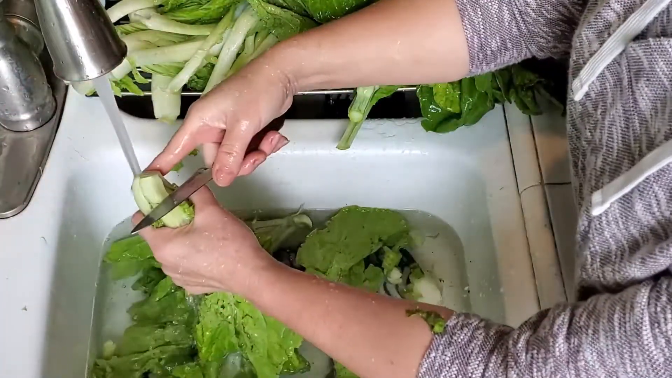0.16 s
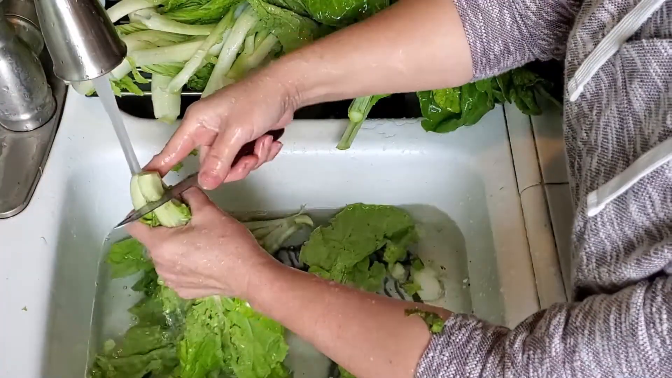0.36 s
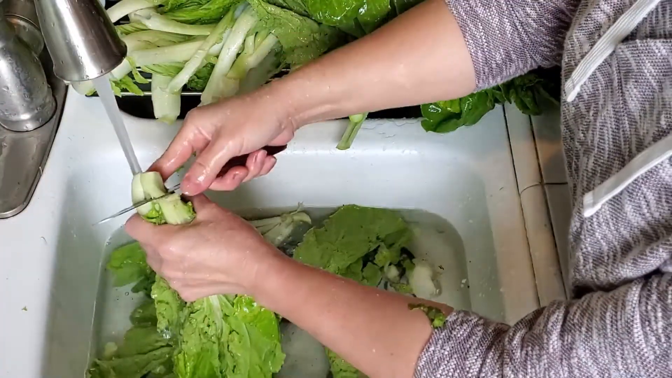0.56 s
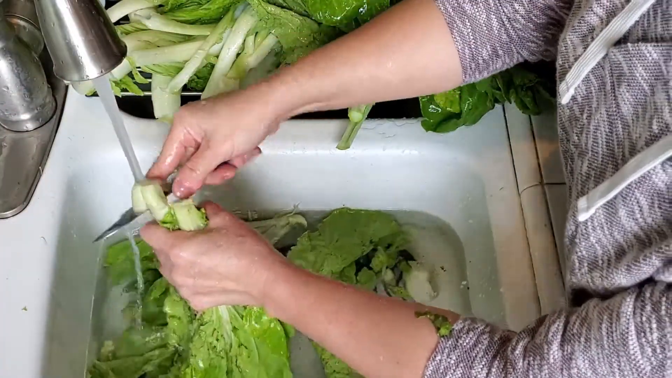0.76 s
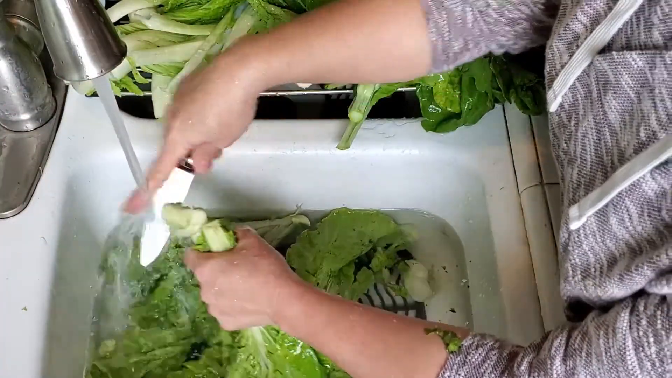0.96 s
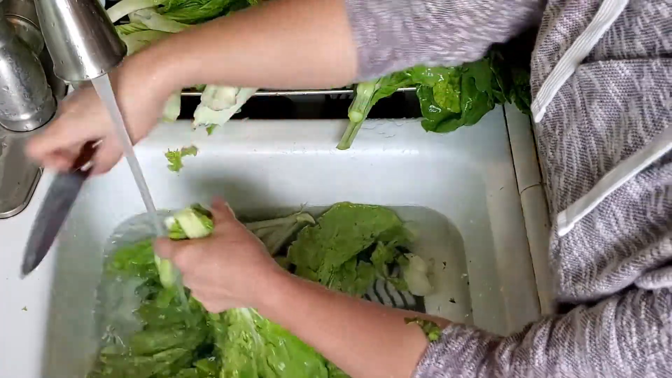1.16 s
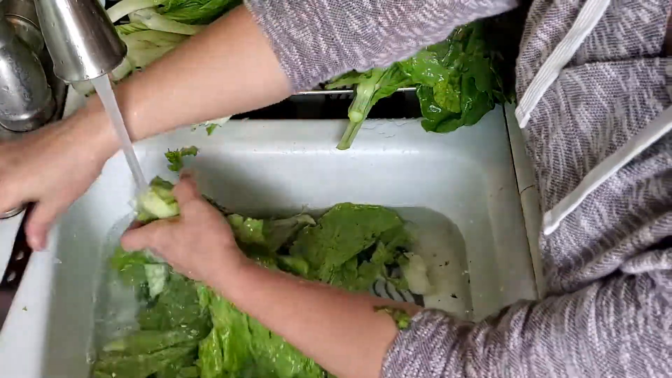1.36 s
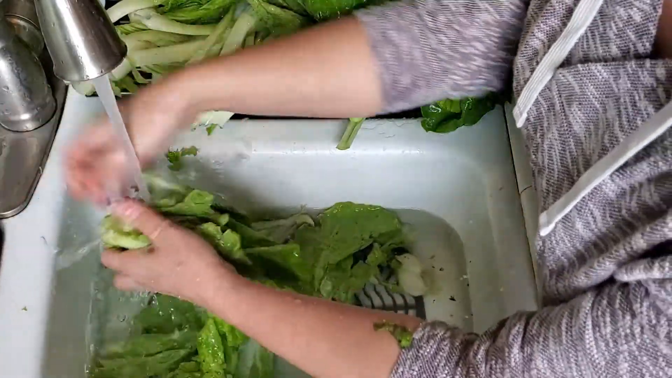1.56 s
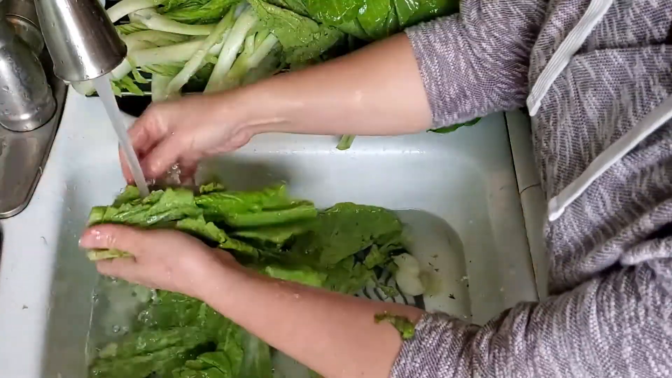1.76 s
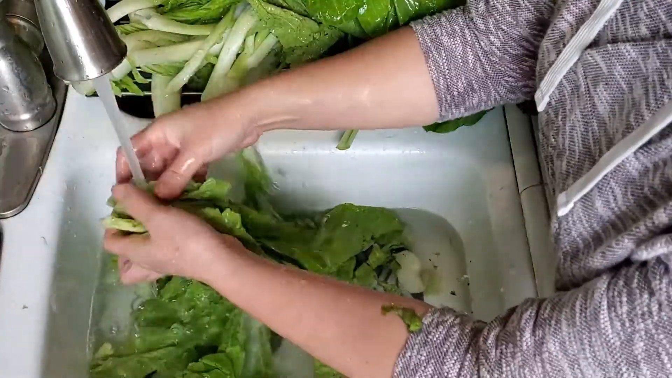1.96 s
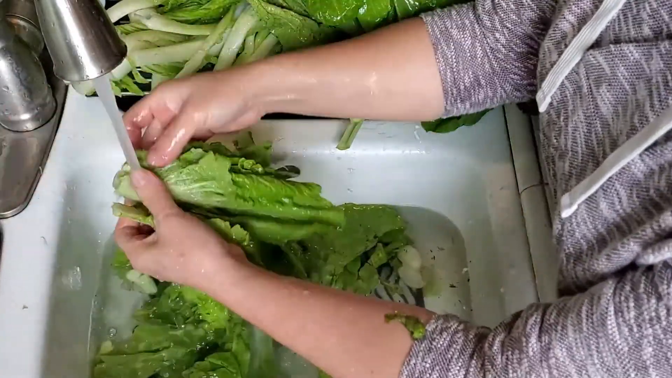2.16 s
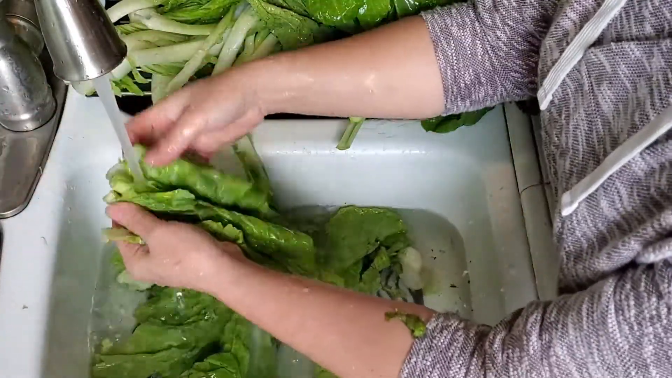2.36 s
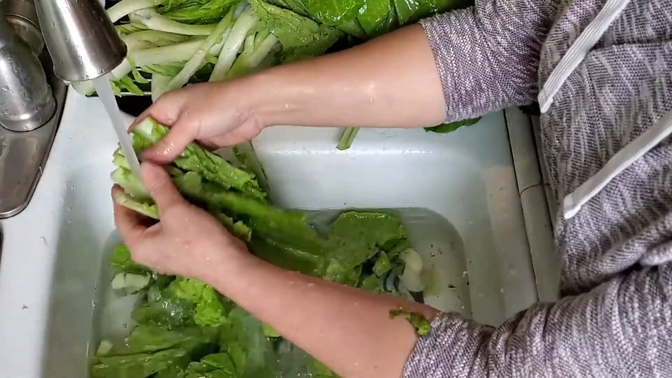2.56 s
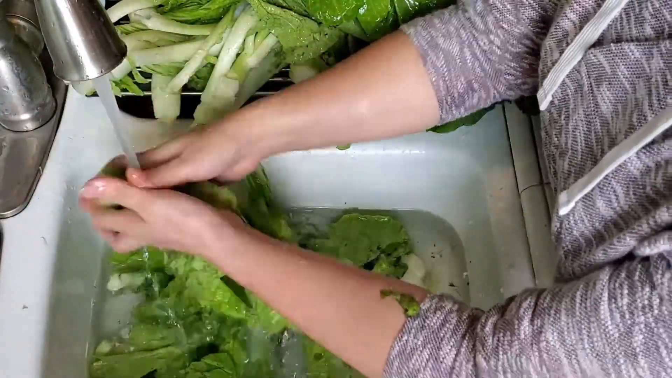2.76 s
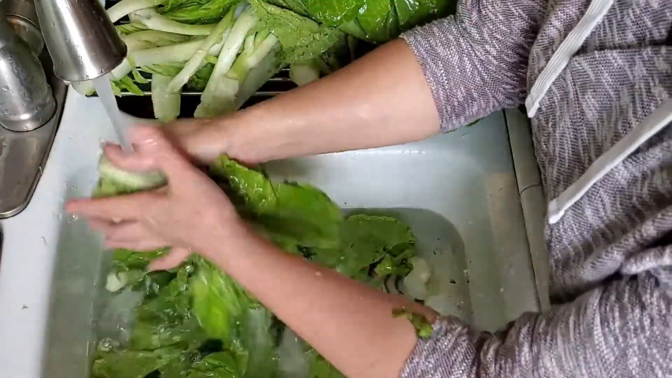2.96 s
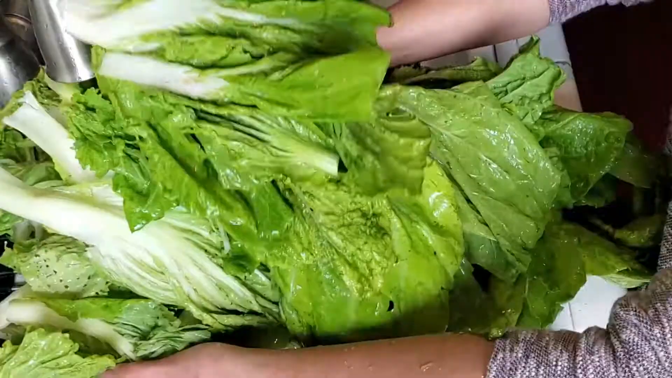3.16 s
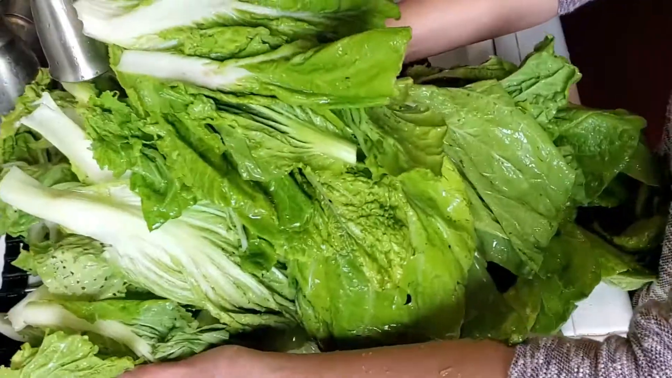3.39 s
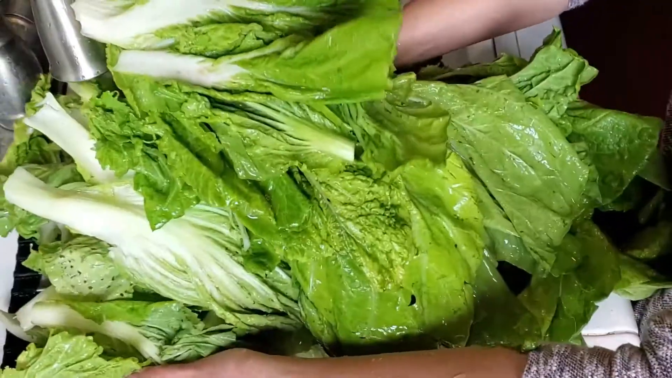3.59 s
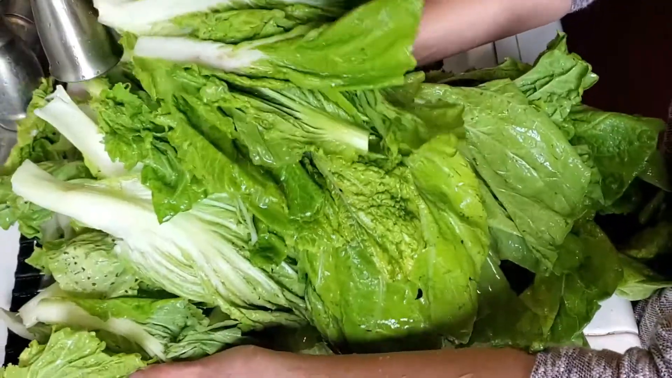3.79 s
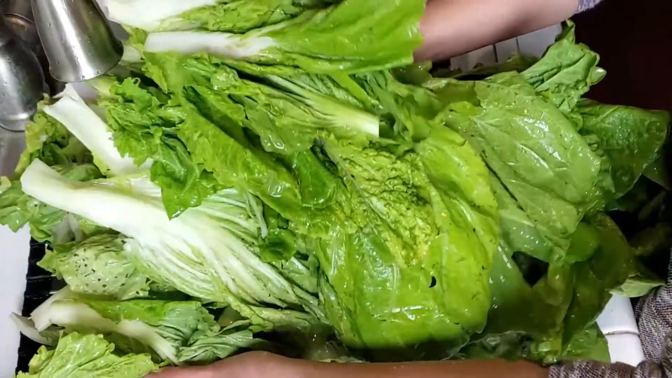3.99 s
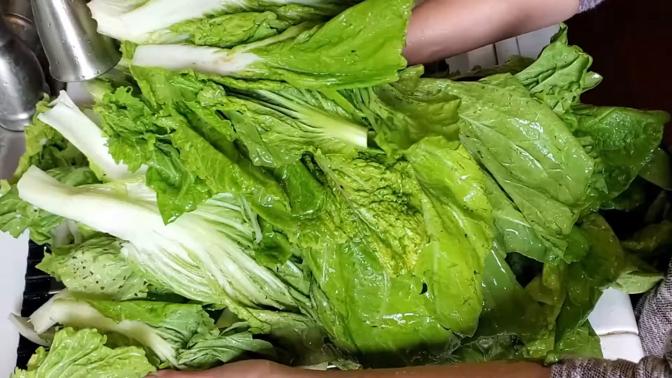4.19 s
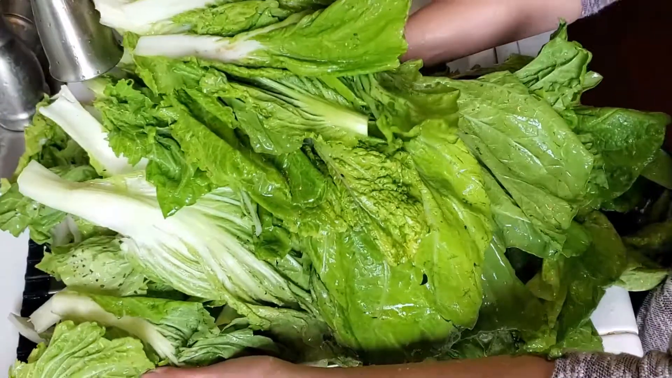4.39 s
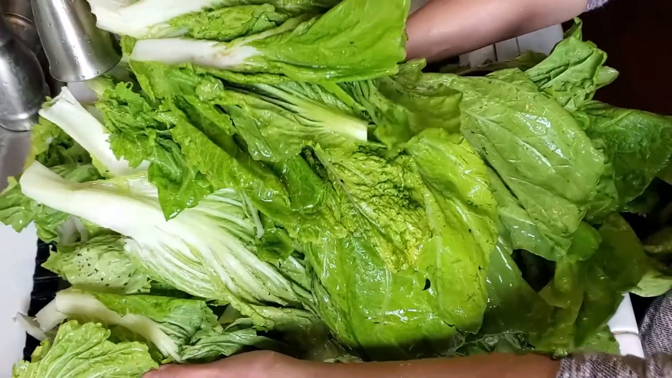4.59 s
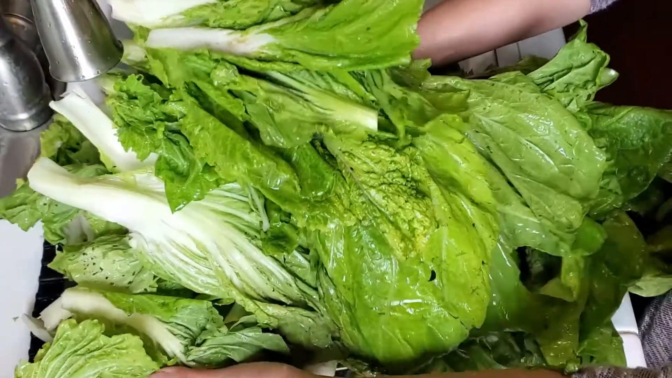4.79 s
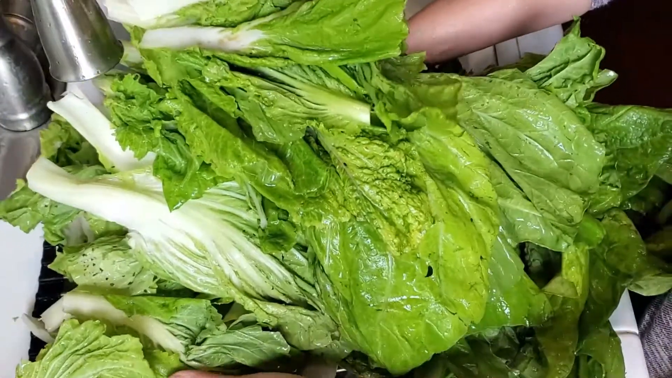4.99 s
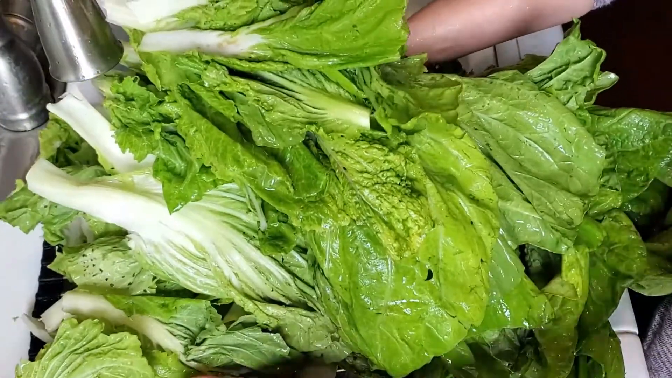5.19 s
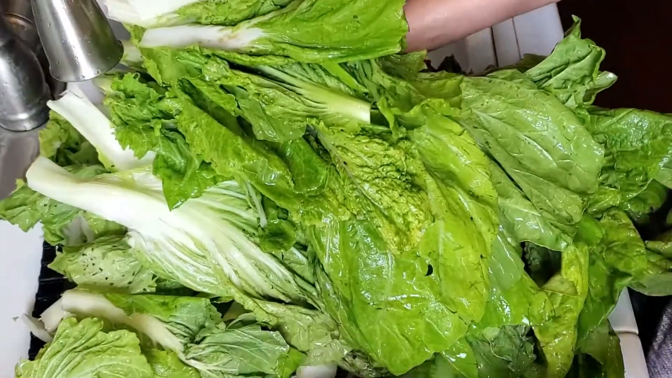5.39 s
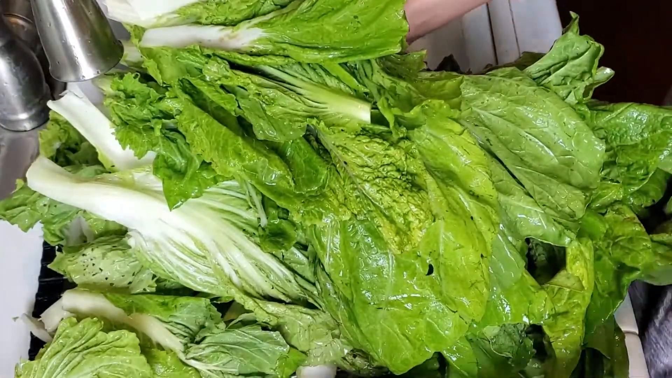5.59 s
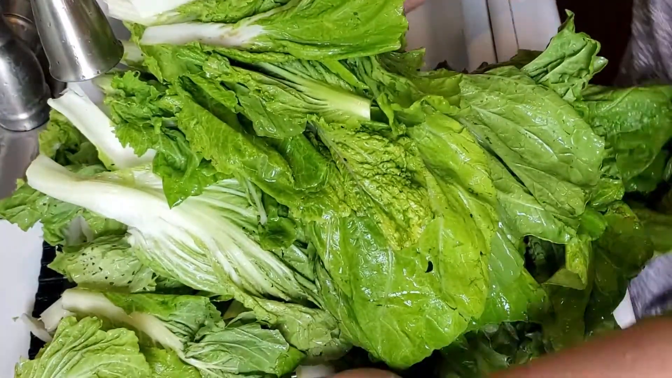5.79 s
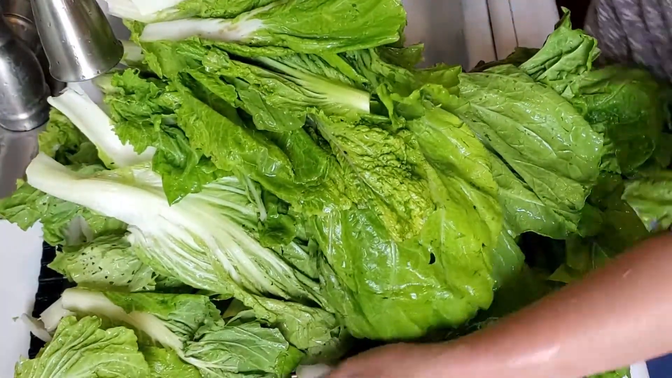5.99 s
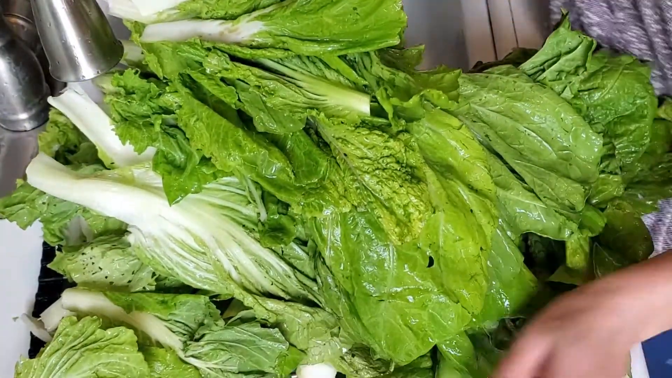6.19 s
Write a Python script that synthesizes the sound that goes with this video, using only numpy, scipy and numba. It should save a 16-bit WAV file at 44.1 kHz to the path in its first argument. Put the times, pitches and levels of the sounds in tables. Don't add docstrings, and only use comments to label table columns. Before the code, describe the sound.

Kitchen tap hisses over leafy greens as a knife cracks stalks and clatters down, then water abruptly stops, leaving drain drips and wet leaf ticks.

```python
import sys
import numpy as np
from scipy import signal
from scipy.fft import rfft, irfft
from scipy.io import wavfile
from scipy.ndimage import uniform_filter1d
from numba import njit

SR = 44100
rng = np.random.default_rng(int(sys.argv[2]) if len(sys.argv) > 2 else 0)


def inscribe(sig):
    pcm = np.round(np.clip(np.atleast_2d(sig).T, -1, 1) * 32767)
    wavfile.write(sys.argv[1], SR, pcm.astype(np.int16))


def boost_factor(decibels):
    exponent = np.asarray(decibels, float) / 20
    return 10 ** exponent


N = 275625
TAP_OFF_S = 3.218
PORT_TILT_DB = np.array([[0.8], [-0.8]])


def unit(x):
    return x / np.sqrt(np.mean(x ** 2))


def curves(table):
    s, *columns = np.transpose(table)
    return [np.interp(np.arange(N) / SR, s, c) for c in columns]


def on_log(hz, points):
    point_hz, value = np.array(points)[:, :2].T
    return np.interp(np.log(hz), np.log(point_hz), value)


@njit
def svf(x, hz, width):
    y, b, l = np.empty(len(x)), 0., 0.
    g, k = np.tan(np.pi * hz / SR), width / hz
    for i in range(len(x)):
        v = (b + g * (x[i] - l)) / (1 + g * (g + k))
        b, l, y[i] = 2 * v - b, l + 2 * g * v, k * v
    return y


def svf_twice(x, hz, width):
    return svf(svf(x, hz, width), hz, width)


def walk(rate_hz):
    k = max(int(SR / rate_hz), 1)
    held = np.repeat(rng.standard_normal(N // k + 1), k)
    return 1.7 * uniform_filter1d(uniform_filter1d(held, k), k)[:N]


def droplets(rate_hz, spread_db):
    size = np.minimum(rng.exponential(size=N), 3.5)
    return (rng.random(N) < rate_hz / SR) * rng.choice([-1., 1.], N) * boost_factor(spread_db * size)


def hiss(droplet_db, rate_hz, spread_db):
    return rng.standard_normal(N) + boost_factor(droplet_db) * unit(droplets(rate_hz, spread_db))


def tinted(x, points):
    hz = np.maximum(np.fft.rfftfreq(N, 1 / SR), 1)
    return unit(irfft(rfft(x) * boost_factor(on_log(hz, points)), N))


def add(out, s, x):
    i = int(s * SR)
    out[i:i + len(x)] += x[:N - i]


def until_tap_off(fade_s):
    return np.clip((TAP_OFF_S - np.arange(N) / SR) / fade_s, 0, 1)


def patchy(x, patchy_db, span_s, span_hz):
    frames = signal.stft(x, nperseg=256)[2]
    wide, long = max(int(span_hz * 256 / SR), 1), max(int(span_s * SR / 128), 1)
    field = uniform_filter1d(rng.standard_normal(frames.shape[-2:]), wide, axis=0)
    field = uniform_filter1d(uniform_filter1d(field, long, axis=1), long, axis=1)
    return signal.istft(frames * boost_factor(patchy_db * unit(field)), nperseg=256)[1][..., :N]


def bubbles(table, t60_s, glide, beat, rough, rise_s):
    out, t = np.zeros(N), np.arange(SR // 3) / SR
    chance = rng.standard_normal((len(table), 2))
    churn = 1 + rough * walk(220)
    onset = (1 - np.exp(-t / max(rise_s, .0005))) ** 2
    for (s, db, hz), (detune, turn) in zip(table, chance):
        t60 = t60_s * (1000 / hz) ** 0.19
        phase = 2 * np.pi * hz * t * (1 + glide * t * hz / 1000)
        ring = np.sin(phase) + beat * np.sin(phase * (1 + 0.046 * detune) + turn)
        add(out, max(s - rise_s, 0), boost_factor(db + 1.5) * ring * onset * 1000 ** (-t / max(t60, .01)))
    return out * churn


def snaps(table, length_s, sharpness, broad_db):
    out, t = np.zeros(N), np.arange(SR // 6) / SR
    for s, db, hz, *_ in table:
        rise = np.minimum(t / 0.00062 * boost_factor(db + 16), 1)
        burst = rng.standard_normal(len(t)) * np.exp(-t / max(length_s, .001)) * rise
        broad = boost_factor(broad_db) * svf(burst, 11900.0, 33000.0)
        bright = broad + np.sqrt(sharpness) * svf(burst, 1. * hz, hz / sharpness)
        add(out, s, boost_factor(db) * bright / np.abs(bright).max())
    return out


# t/s, spray off hands and leaves level/dB, plunge into the pool level/dB
FLOW_DB = [(0.0, -43, -53), (0.37, -39.5, -48), (0.5, -47, -49.5), (0.8, -43, -48.5), (1.12, -39.5, -52),
           (1.39, -40, -50), (1.47, -61, -46), (1.6, -51, -45.5), (1.76, -48, -56), (1.95, -49, -55),
           (2.06, -45, -52), (2.2, -44, -52.5), (2.4, -49, -57.5), (2.55, -46, -57.5), (2.78, -49.5, -53.5),
           (2.9, -47, -47.5), (3.06, -43.5, -49), (3.21, -45, -50)]
# f/Hz, density level/dB
SPRAY_DB = [(1470, -45), (2500, -7.5), (5420, 4), (6760, 1), (7920, -6), (9200, -1), (15100, 2),
            (16100, -3), (16500, -52)]
# f/Hz, density level/dB
SPLASH_DB = [(260, -17), (450, -29), (698, 2.5), (793, -4), (1250, -1), (1480, -1.5), (2000, 1.5),
             (4000, 1), (5200, -6), (8800, -120)]


def tap(surge):
    spray_db, splash_db = curves(FLOW_DB)
    fine = hiss(11.5, 2500, 4.1)
    coarse = hiss(0.0, 500, 2.7)
    spray = tinted(fine, SPRAY_DB) * boost_factor(spray_db + 2.0 + 0.8 * surge + 1.6 * walk(55))
    splash = tinted(coarse, SPLASH_DB) * boost_factor(splash_db + 3.0 + 1.06 * surge + 2.57 * walk(24.88))
    return (spray + splash) * until_tap_off(.004)


def spatter(count=260):
    when, pitch, size = rng.random((count, 3)).T
    s = when * TAP_OFF_S
    pool_db = np.interp(s, *np.transpose(FLOW_DB)[[0, 2]])
    db = pool_db + 1.5 - 2.8 * np.log(np.maximum(size, .05))
    hz = 1400 * 2 ** (2.4 * pitch)
    return bubbles(np.transpose([s, db, hz]), t60_s=0.05, glide=0.74, beat=0.42, rough=0.55, rise_s=.002)


# t/s, peak level/dB, f/Hz
PLOPS = [(0.018, -28, 797), (0.045, -39, 700), (0.258, -33.5, 1606), (0.322, -41, 794), (0.379, -43, 990),
         (0.489, -31.5, 930), (0.509, -36, 1330), (0.547, -30, 947), (0.632, -32, 940), (0.648, -30.5, 940),
         (0.833, -36.5, 933), (0.347, -36, 524), (0.35, -31.5, 1540), (0.47, -36, 623), (0.655, -27, 1620),
         (0.909, -35.5, 1160), (1.081, -34, 1150), (1.157, -27, 940), (1.168, -27, 1043), (1.262, -30, 595),
         (1.288, -29.5, 625), (1.49, -38.5, 602), (1.562, -35, 720), (1.774, -41.5, 1117),
         (2.335, -46, 1120), (2.71, -45, 1155), (2.038, -36, 1212), (2.239, -39, 1330), (2.871, -28, 646),
         (2.919, -48, 676)]


def plops():
    return bubbles(PLOPS, t60_s=0.093, glide=1.0, beat=0.5, rough=0.45, rise_s=.0025)


# t/s, length/s, level/dB, centre f/Hz
SLOSH = [(0.825, 0.042, -39, 1280), (0.859, .016, -29, 2150), (0.86, .012, -35, 3800),
         (0.872, .03, -37, 2400), (0.895, .05, -45, 1600), (0.927, 0.017, -44, 3300),
         (1.007, 0.014, -33.5, 3570), (1.025, 0.018, -36, 3800), (1.172, 0.024, -33, 3200),
         (1.177, .015, -36, 1620), (1.225, .015, -37, 2900), (1.231, 0.021, -38, 3600),
         (1.256, 0.0072, -36, 3800), (1.328, 0.031, -39, 3300), (1.873, .015, -46.5, 2990),
         (1.967, .015, -48, 3360), (2.162, 0.018, -54, 4500), (2.192, 0.13, -45, 1400),
         (2.24, 0.045, -46, 4660), (2.32, 0.028, -45, 2960), (2.435, 0.018, -54, 4300),
         (2.532, 0.056, -47, 1910), (2.573, 0.045, -46, 3500), (2.645, .035, -47, 3370),
         (2.675, 0.025, -46, 1630), (2.77, .025, -49.5, 4130), (2.902, 0.062, -46.5, 1190)]


def slosh():
    out, t = np.zeros(N), np.arange(SR // 4) / SR
    swarm = hiss(3.0, 900, 2.7)
    for s, length_s, db, hz in SLOSH:
        x = t / max(0.22 * length_s, .0005)
        band = svf(swarm[int(s * SR):][:len(t)], 1. * hz, hz / 4)
        band = svf(band, 1. * hz, hz / 2)
        add(out, s, boost_factor(db) * unit(band) * x * np.exp(1 - x))
    return out


# t/s, peak level/dB, centre f/Hz
SPURTS = [(1.7292, -36, 12200), (1.8415, -34, 13500), (1.9028, -35, 10600), (1.9577, -36, 13300),
          (2.0166, -35, 12500), (2.061, -31, 11100), (2.1288, -35, 12400), (2.1862, -37, 12800),
          (2.2431, -32, 12400), (2.2874, -36, 15300), (2.3583, -39, 12400), (2.4107, -38, 13600),
          (2.4655, -35, 12300), (2.5379, -33, 13000), (2.6362, -38, 13900), (2.692, -33, 13800),
          (2.7235, -35, 15100), (2.7584, -36, 13600), (2.919, -34, 12800), (2.9599, -33, 10500),
          (2.9928, -29, 14300), (3.0328, -33, 12400), (3.0886, -35, 10400), (3.144, -32, 12000)]


def spurts():
    return snaps(SPURTS, length_s=.008, sharpness=2.5, broad_db=3.0)


# t/s, peak level/dB, centre f/Hz, body relative level/dB, body f/Hz
CRACKS = [(0.263, -24, 4900, -20, 1590), (0.31, -25.5, 5960, -10, 880), (0.3483, -19.5, 6200, -7, 880),
          (0.4661, -23.5, 6700, -2, 940), (0.4697, -11, 5800, -5.5, 1300), (0.535, -18.5, 3800, -11, 1040),
          (0.63, -18.5, 3680, -12, 1030), (0.6504, -20, 6050, -10, 1040), (0.8576, -23, 3870, -0.5, 2320),
          (1.063, -20, 5700, -40, 1160), (1.157, -25, 4900, -10.5, 940), (2.0595, -29, 4830, -13, 1230),
          (2.8554, -31, 3520, -25, 735), (2.8722, -22.5, 6000, -24, 651), (2.9347, -31.5, 3740, -6.5, 1730),
          (3.14, -32, 6810, -4, 1720), (3.176, -25, 5470, -4.5, 1670)]


def cracks():
    return snaps(CRACKS, length_s=0.0084, sharpness=3.2, broad_db=-3.0)


# f/Hz, width/Hz, level/dB
SINK_MODES = [(313, 90, -6), (564, 180, 10), (940, 73, 5.5), (1300, 120, 2), (1610, 220, -2),
              (1920, 160, -4), (2350, 260, -13)]


def knocks():
    out, t = np.zeros(N), np.arange(SR // 6) / SR
    for s, db, _, body_db, body_hz in CRACKS:
        push = rng.standard_normal(len(t)) * np.exp(-t / (0.64 * 0.0084))
        body = boost_factor(-15.0) * svf(push, 1. * body_hz, 0.69 * body_hz)
        for hz, width_hz, mode_db in SINK_MODES:
            octaves_off = abs(np.log2(hz / body_hz))
            body = body + boost_factor(mode_db - 22.0 * octaves_off) * svf(push, 1. * hz, 1. * width_hz)
        add(out, s, boost_factor(db + body_db + 6.5) * body / np.abs(body).max())
    return out


# t/s, peak level/dB, chatter decay/s, mode 1 f/Hz, mode 2 f/Hz
KNIFE_HITS = [(1.4113, -5, 0.013, 9160, 13100), (1.4518, -30, .001, 11000, 14000),
              (1.4529, -2.5, .002, 9000, 6600), (1.4655, -24, .002, 10300, 4000),
              (1.4785, -20, .002, 6300, 15000), (1.482, -19, 0.0022, 3940, 15200),
              (1.4912, -22, .002, 3700, 15000), (1.5, -27, 0.0066, 4600, 9100),
              (1.5353, -19, 0.0025, 3780, 6640), (1.5453, -27, .003, 15300, 6000),
              (1.569, -27, .003, 3700, 6500), (1.5754, -25, 0.0036, 6300, 9100),
              (1.5825, -19, 0.0034, 5700, 12500), (1.596, -27, 0.0017, 4740, 9000),
              (1.62, -7.5, .0018, 9700, 4950), (1.632, -24, .002, 4550, 10000)]
# t/s, level/dB
SLIDE_DB = [(1.4545, -90), (1.456, -31), (1.49, -33), (1.515, -36), (1.535, -37.5), (1.56, -39),
            (1.585, -38), (1.608, -43), (1.618, -90)]


def knife():
    out, t = np.zeros(N), np.arange(SR // 8) / SR
    contact = np.clip((0.0057 - t) / 0.0005, 0, 1)
    for s, db, decay_s, first_hz, second_hz in KNIFE_HITS:
        envelope = np.exp(-t / max(decay_s, .0003)) * contact + 0.19 * np.exp(-t / 0.014)
        chatter = rng.standard_normal(len(t)) * envelope
        hit = boost_factor(0.3 * db) * svf(svf(chatter, 10500.0, 19000.0), 9500.0, 19000.0)
        hit = hit + boost_factor(5.5) * svf(chatter, 1. * first_hz, 500.0)
        hit = hit + boost_factor(6.0) * svf(chatter, 1. * second_hz, 690.0)
        add(out, s, boost_factor(db) * hit / np.abs(hit).max())
    grit = hiss(9.0, 1700, 1.9)
    scrape = unit(svf(svf(grit, 6800.0, 14000.0), 6200.0, 14000.0))
    scrape = scrape + boost_factor(-4.0) * unit(svf(grit, 13800.0, 5000.0))
    return out + boost_factor(curves(SLIDE_DB)[0]) * scrape


# t/s, level/dB
TRICKLE_DB = [(3.22, -72), (3.6, -55), (3.9, -55.5), (4.15, -56.5), (4.4, -61), (4.9, -54.5), (5.25, -64),
              (5.57, -49.5), (5.72, -59), (6.0, -48), (6.07, -54), (6.13, -45.5), (6.25, -63)]
# f/Hz, width/Hz, level/dB
PIPE_MODES = [(1160, 56, -3), (1455, 21, -5.5), (1590, 21, -7.5), (1730, 55, 2), (1998, 24, -11),
              (1560, 1100, -2)]
# f/Hz, width/Hz, level/dB
UPPER_PIPE_MODES = [(2932, 21, -9), (3170, 45, 1), (3430, 110, 1), (3900, 400, 2), (4300, 300, -1),
                    (6060, 320, -10.5)]


def pipe(modes, rate_hz, spread_db, widen):
    return unit(sum(boost_factor(db) * unit(svf(droplets(rate_hz, spread_db), 1. * hz, widen * width_hz))
                    for hz, width_hz, db in modes))


def drain():
    low_db, = curves(TRICKLE_DB)
    upper_db = -56.5 + 0.38 * (low_db - low_db.max()) + 1.8 * walk(8.1)
    low = pipe(PIPE_MODES, 200, 0.61, 0.62) * boost_factor(low_db - 1.0)
    upper = pipe(UPPER_PIPE_MODES, 400, 2.5, 1.0) * boost_factor(upper_db + 3.5)
    rustle = svf(hiss(24, 700, 4.8), 6600.0, 18000.0) * boost_factor(1.4 * walk(29))
    after = np.arange(N) / SR > TAP_OFF_S
    return low + upper + after * unit(rustle) * boost_factor(-78.5 + 2.2 * walk(6.7))


# t/s, peak level/dB, f/Hz
DRIPS = [(3.2493, -52, 1230), (3.276, -40, 1690), (3.3576, -43, 1724), (3.4456, -38, 1730),
         (3.4966, -52, 1230), (3.5938, -47, 1115), (3.7123, -35.5, 1168), (3.7629, -41, 1130),
         (3.945, -49, 1180), (4.0714, -34, 1710), (4.0944, -40, 1727), (4.1312, -29.5, 1750),
         (4.2432, -40, 1165), (4.3034, -45, 1190), (4.3987, -40, 1145), (4.4528, -44.5, 1750),
         (4.4844, -37, 1740), (4.554, -44, 1750), (4.866, -41, 1760), (5.503, -36, 1160),
         (4.975, -54, 1750), (5.1014, -46, 1710), (5.169, -39, 1660), (5.383, -45, 1140),
         (5.541, -44, 1200), (5.5961, -47, 1740), (5.7057, -51, 1790), (5.9432, -48, 1810),
         (5.993, -43, 1680), (6.0885, -45, 1650)]


def drips():
    return bubbles(DRIPS, t60_s=0.088, glide=0.027, beat=0.3, rough=0.3, rise_s=.0035)


# t/s, peak level/dB, f/Hz
GULPS = [(3.322, -55, 1430), (3.507, -46, 1160), (3.462, -53, 1187), (3.735, -49, 1750), (4.585, -51, 1757),
         (5.486, -32, 1160), (5.508, -46, 1950), (5.51, -46, 1720), (5.548, -46, 1700), (5.608, -48, 1960),
         (5.635, -48, 1740), (4.452, -48, 1980), (3.875, -46, 3170), (6.245, -47, 1150), (5.815, -49, 1720),
         (6.105, -43, 1720), (4.78, -50, 1730), (5.43, -50, 1160), (4.172, -42, 1170), (4.487, -54, 1224),
         (4.508, -46, 1130), (4.566, -44, 1130), (5.014, -49.5, 970), (5.409, -47, 1580),
         (5.549, -51, 1446), (3.95, -53, 750), (4.03, -51, 798), (4.49, -49, 722), (5.82, -46, 990),
         (5.85, -45, 1156), (5.999, -49, 1560), (6.012, -39, 1410), (6.103, -44, 1390), (6.119, -38, 1483),
         (6.159, -45, 1196)]


def gulps():
    return bubbles(GULPS, t60_s=0.14, glide=0.08, beat=0.3, rough=0.3, rise_s=.0035)


# t/s, peak level/dB, f/Hz
BLIPS = [(3.3531, -44, 3030), (3.394, -43, 3400), (3.4569, -48, 3480), (3.5013, -51, 3480),
         (3.61, -51, 3200), (3.678, -41, 3150), (3.7617, -59, 3400), (3.8243, -42, 3180),
         (3.966, -46, 3180), (4.1034, -49, 3360), (4.264, -50, 3380), (4.3326, -44, 3140),
         (4.4706, -44, 3230), (4.7295, -48, 3500), (4.8168, -50, 3660), (4.8861, -45, 2880),
         (4.939, -46, 3200), (4.9706, -45, 3145), (5.0178, -43, 3400), (5.0457, -45, 3450),
         (5.1635, -47, 2920), (5.3087, -51, 3170), (5.4079, -46, 3220), (5.4448, -43, 3370),
         (5.4857, -39, 3350), (5.7644, -40, 3154), (5.825, -42, 3130), (5.9277, -49, 3120),
         (5.9796, -44, 3170), (6.1398, -48, 3170)]


def blips():
    return bubbles(BLIPS, t60_s=0.079, glide=0.03, beat=0.3, rough=0.35, rise_s=.003)


# t/s, peak level/dB, centre f/Hz
TICKS = [(3.255, -37.5, 4520), (3.36, -39, 4200), (3.402, -42, 3350), (3.832, -34, 3730),
         (3.886, -39, 5800), (3.96, -40, 3180), (4.1, -45.5, 4370), (4.1702, -49, 3400), (4.198, -39, 3970),
         (4.264, -50, 4140), (4.545, -40, 3170), (4.5835, -36, 5900), (4.698, -46, 3900),
         (4.7723, -49, 3600), (4.936, -40.5, 3220), (4.9739, -39.5, 5600), (5.055, -36.5, 5260),
         (5.158, -55, 3380), (5.213, -36, 4350), (5.312, -38.5, 4350), (5.4009, -38.5, 6370),
         (5.548, -47, 3220), (5.7635, -38, 3260), (5.978, -43, 4070), (6.078, -38.5, 4280),
         (6.143, -43, 3160), (6.227, -42, 5250)]


def ticks():
    return snaps(TICKS, length_s=0.014, sharpness=7.2, broad_db=-21.0)


# t/s, peak level/dB, centre f/Hz
FIZZ = [(3.675, -46, 10100), (3.88, -43, 13900), (4.027, -47, 12500), (4.259, -44.5, 9000),
        (4.4283, -44, 9900), (4.6942, -45, 10500), (4.8499, -37.5, 13400), (5.1592, -49, 10500),
        (5.235, -37, 12900), (5.246, -39.5, 9700), (5.4031, -44, 12700), (5.547, -33, 11100),
        (5.557, -38, 11500), (5.8331, -44, 13200), (6.102, -47, 10500), (6.125, -41, 14500)]


def fizz():
    return snaps(FIZZ, length_s=0.0055, sharpness=8.3, broad_db=1)


# f/Hz, density level/dB
ROOM_TONE_DB = [(25, -24), (42, 8.5), (100, -11), (200, -3.5), (300, 3), (420, -3.5), (520, -6),
                (1000, -6.5), (2000, -6), (3200, -7.5), (5000, -12), (6500, -11.5), (7800, -24),
                (11000, -17.5), (16000, -16.5)]
# f/Hz, level/dB, width/Hz
HUM_LINES = [(60.4, -56, 6.2), (119.3, -62, 1.7), (145.3, -64.5, 4.4), (422.2, -63.5, 2.7)]
# f/Hz, share common to both
LIKENESS = [(30, 0.997), (70, .97), (125, 0.8), (250, 0.7), (500, 0.51), (1000, 0.032), (4000, 0.048)]
# t/s, level/dB
RUMBLE_DB = [(0.0, -44.5), (0.23, -59), (0.5, -49.5), (1.3, -51.5), (1.93, -76), (2.45, -63), (2.71, -61),
             (2.94, -50), (3.41, -55.5), (6.25, -59.5)]


def kitchen():
    hz = np.maximum(np.fft.rfftfreq(N, 1 / SR), 1)
    like = np.clip(on_log(hz, LIKENESS), 0, 1)
    mid, side = rfft(rng.standard_normal((2, N))) * boost_factor(on_log(hz, ROOM_TONE_DB))
    air = irfft(np.sqrt(1 + like) * mid + np.sqrt(1 - like) * side * np.array([[1], [-1]]), N)
    air = patchy(unit(air), 2.22, 0.031, 1200) * boost_factor(-50 + 0.41 * walk(8.2) + PORT_TILT_DB)
    hum = sum(boost_factor(db) * unit(svf(rng.standard_normal(N), 1. * f, 1. * width_hz))
              for f, db, width_hz in HUM_LINES)
    rumble_db, = curves(RUMBLE_DB)
    deep = unit(svf_twice(rng.standard_normal(N), 48.0, 16.0)) * boost_factor(rumble_db - 4.5)
    low = unit(svf_twice(rng.standard_normal(N), 136.0, 180.0)) * boost_factor(rumble_db - 6.0)
    return air + hum + deep + low


def ports(shared, apart, wet_db):
    lag_s, basin_t60_s, walls_t60_s = .00012, 0.12, 0.39
    late = irfft(rfft(shared) * np.exp(-2j * np.pi * np.fft.rfftfreq(N, 1 / SR) * lag_s), N)
    direct = np.array([shared, late]) + apart
    t = np.arange(SR // 2) / SR
    basin, walls = (rng.standard_normal((2, len(t))) * 1000 ** (-t / t60) * (t > .001)
                    for t60 in (basin_t60_s, walls_t60_s))
    tail = (boost_factor(-5) * unit(basin) + boost_factor(-3) * unit(walls)) / np.sqrt(len(t))
    echo = signal.fftconvolve(direct, tail, axes=1)[:, :N]
    return (direct + boost_factor(wet_db) * echo) * boost_factor(PORT_TILT_DB - 1.5)


def scene():
    surge = walk(11.87)
    water = patchy(np.array([tap(surge), tap(surge), tap(surge)]), 2.2, .015, 900)
    bright = np.array([cracks() + slosh() + spurts() for _ in range(2)])
    shared = boost_factor(-7) * water[2] + plops() + knocks() + spatter()
    rinsing = ports(shared, water[:2] + boost_factor(2.5) * bright, -2.36)
    rinsing = rinsing + ports(np.zeros(N), boost_factor(3.5) * np.array([knife(), knife()]), -8.0)
    leaves = np.array([ticks() + fizz() for _ in range(2)])
    trickle = patchy(drain(), 2.2, 0.047, 700) + drips() + gulps() + boost_factor(0.5) * blips()
    draining = ports(boost_factor(2.5) * trickle, boost_factor(1.0) * leaves, -1.0)
    return rinsing * until_tap_off(0.014) + draining + kitchen()


def roll_off(x):
    return signal.sosfilt(signal.butter(12, 16810, fs=SR, output="sos"), x)


def record(dry):
    top_hz, top_db = 15880, -42
    shelf = np.where(np.fft.rfftfreq(N, 1 / SR) > top_hz, boost_factor(top_db), 1)
    mix = irfft(rfft(dry) * shelf, N)
    return roll_off(mix)


dry = scene()
out = record(dry)
inscribe(out)
```